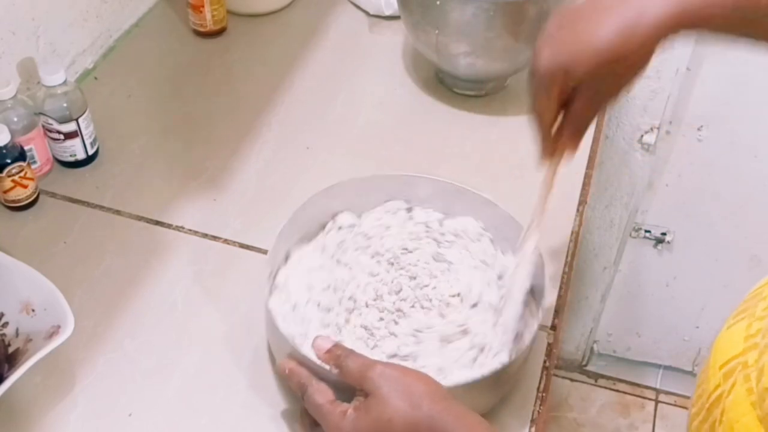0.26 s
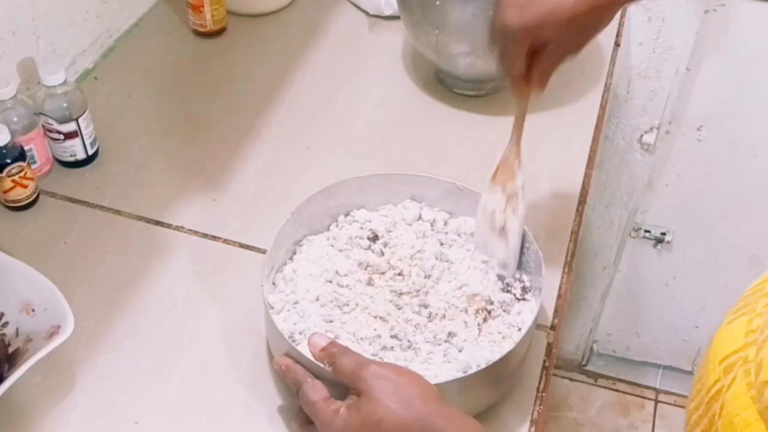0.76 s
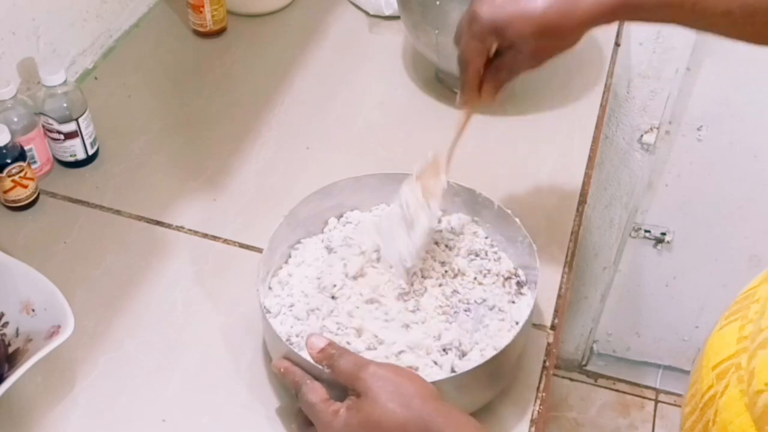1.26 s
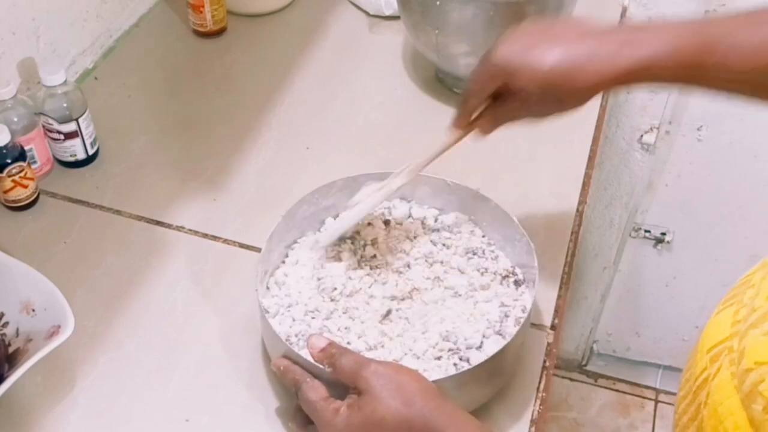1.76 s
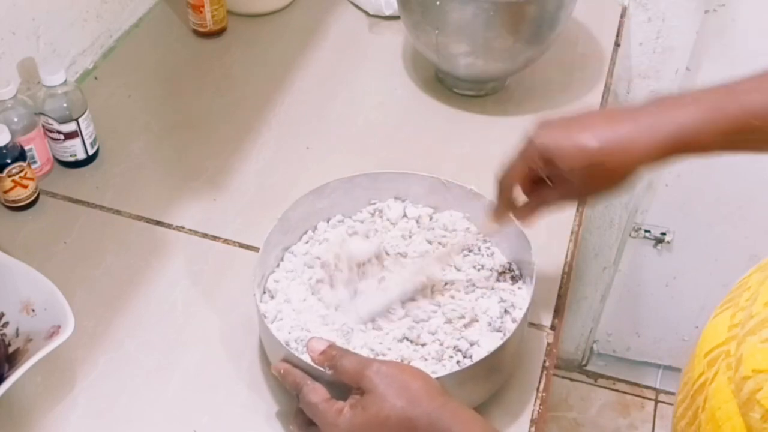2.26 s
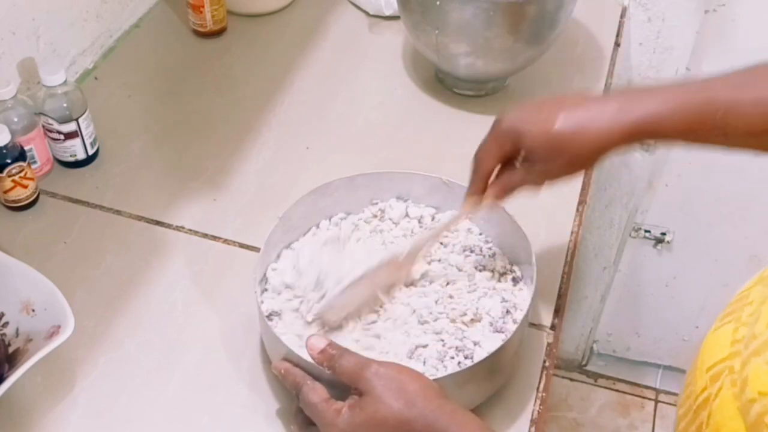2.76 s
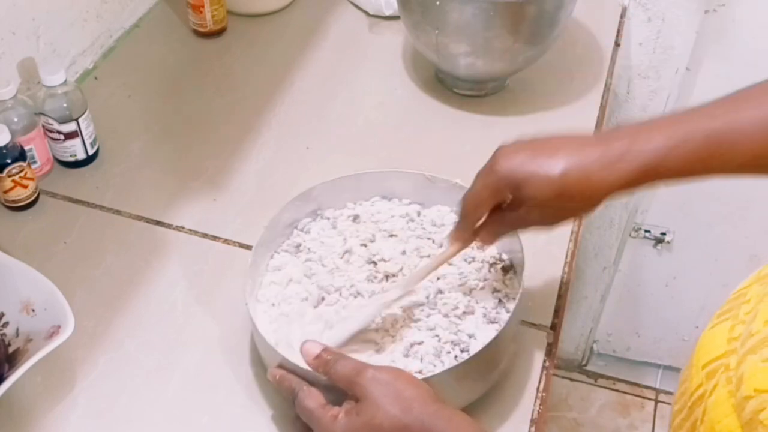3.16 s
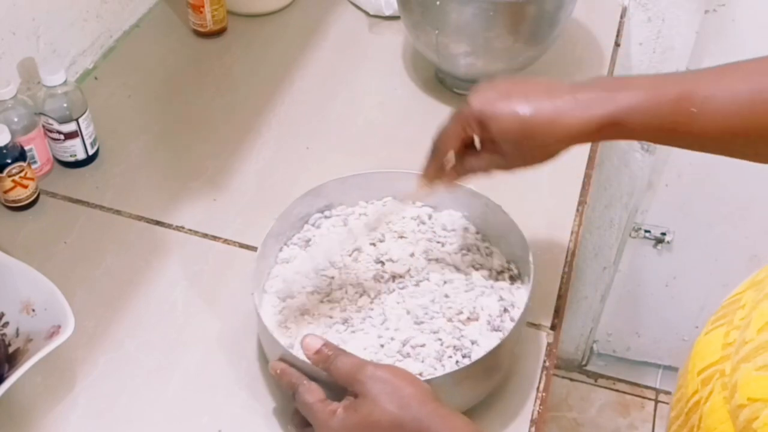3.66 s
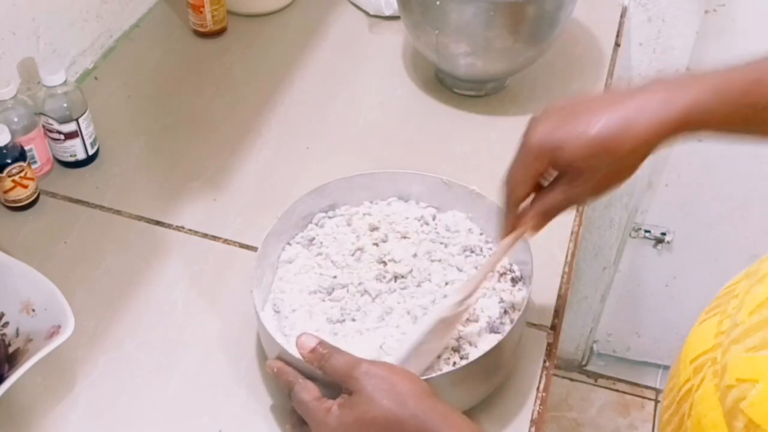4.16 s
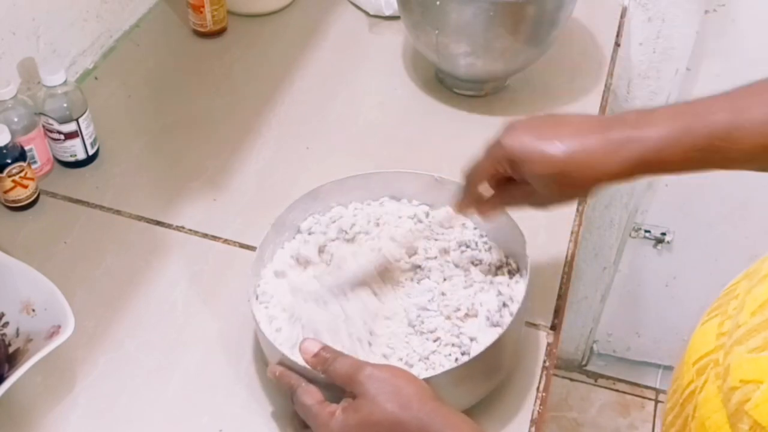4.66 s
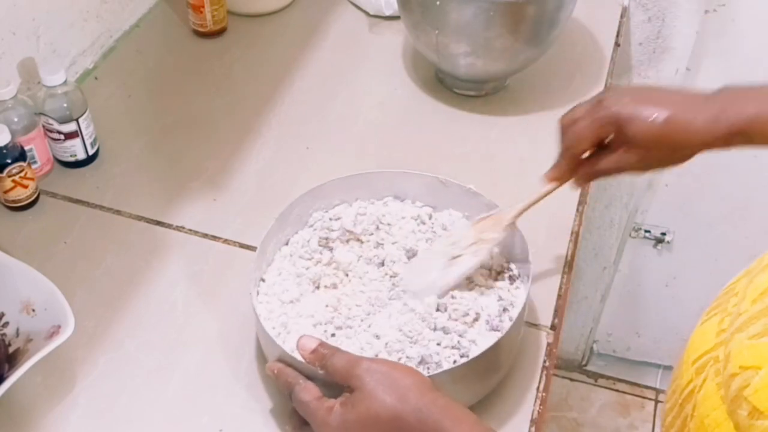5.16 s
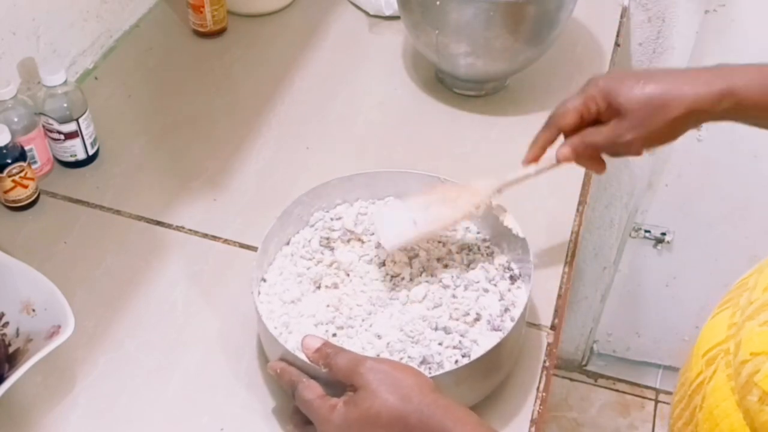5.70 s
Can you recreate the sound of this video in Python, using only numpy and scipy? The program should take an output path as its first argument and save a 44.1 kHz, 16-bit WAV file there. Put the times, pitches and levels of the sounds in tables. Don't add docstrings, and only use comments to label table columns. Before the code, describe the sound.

In a small, slightly reflective kitchen, a spoon pushes through powdery lumps with bright, sandy, fizzing strokes. Two early knocks ring the flour-damped pan briefly, a run of plain sweeps follows, then thuddier taps midway and scraping with a strong final clank. Two spaced microphones sit near the pan; mains hum, a low engine swell around two seconds, far traffic and tiny cricket chirps remain behind.

```python
import sys
import numpy as np
from scipy import signal
from scipy.fft import rfft, irfft
from scipy.io import wavfile
from scipy.ndimage import uniform_filter1d

SR = 44100
rng = np.random.default_rng(int(sys.argv[2]) if len(sys.argv) > 2 else 0)


def magnitude_from_level(level_db):
    exponent = np.asarray(level_db, float) / 20
    return 10 ** exponent


def int16_out(signal):
    q = np.round(np.clip(np.atleast_2d(signal).T, -1, 1) * 32767)
    wavfile.write(sys.argv[1], SR, q.astype(np.int16))


N = 261513
STEP = 16

# frequency in Hz, bandwidth in Hz, level in dB.
PAN_MODES = [(327, 97, 10), (506.5, 109, -6.5), (589, 68, -4), (693, 65.3, 3.5), (790, 71, -4.5),
             (844, 54.6, 0.5), (938, 64, 0.5), (980, 45, -4.5), (1008, 57, -13.5), (1193, 33, -3.5),
             (1295, 54, -20), (1408, 50, -13.5), (1416, 51, -1), (1577, 27, -5), (1700, 16, -30),
             (1902, 172, -27), (2016, 31, -18)]


def evened(x):
    return x / np.sqrt(np.mean(x ** 2) + 1e-20)


def read(points, hz):
    f, value = np.transpose(points)
    return np.interp(np.log(hz + 1), np.log(f + 1), value)


def coloured(x, points):
    gain = magnitude_from_level(read(points, np.fft.rfftfreq(N, 1 / SR)))
    return evened(irfft(rfft(x) * gain, N))


def resonate(x, hz, width):
    r = np.exp(-np.pi * width / SR)
    b = [(1 - r * r) / 2, 0, -(1 - r * r) / 2]
    return signal.lfilter(b, [1, -2 * r * np.cos(2 * np.pi * hz / SR), r * r], x)


def mode(x, hz, width):
    return resonate(resonate(x, hz, width), hz, 4 * width)


def grains(per_s, spread_db, shared):
    size = magnitude_from_level(spread_db * np.minimum(rng.exponential(1, (3, N)), 5))
    size = size * rng.choice([-1., 1.], (3, N))
    clicks = size * (rng.random((3, N)) < per_s / SR)
    return clicks[:2] + shared * clicks[2]


def patchy(x, depth_db):
    z = signal.stft(x, nperseg=512)[2]
    field = rng.standard_normal(z.shape[1:])
    field = uniform_filter1d(field, 2, axis=0)
    field = evened(uniform_filter1d(field, 10, axis=1))
    gain = magnitude_from_level(depth_db * np.clip(field, -3, 1.2))
    return evened(signal.istft(z * gain, nperseg=512)[1][:, :N])


def swell(s, rise, fall, db):
    edge_db, rise_shape, fall_shape = 33.5, 1.86, 1.55
    contact = 0.95
    t = np.arange(0, N, STEP) / SR - s
    begun = np.clip((t + contact * rise) / 0.0036, 0, 1)
    lost = np.where(t < 0, abs(t / rise) ** rise_shape, abs(t / fall) ** fall_shape)
    return begun * magnitude_from_level(db - edge_db * lost)


def joined(rows):
    power = sum(swell(*row) ** 2 for row in rows)
    return np.interp(np.arange(N), np.arange(0, N, STEP), np.sqrt(power)) + 1e-6


def background():
    # frequency in Hz, density in dB per Hz.
    air_spectrum = [(50, -32), (85, -19), (108, -14), (1100, -39), (1370, -34.5), (3000, -44.5),
                    (3730, -47.5), (4070, -43), (4960, -47), (7190, -43.5), (9560, -42), (11900, -55.5),
                    (15800, -59)]
    # peak in seconds, half length in seconds, level in dB.
    surges = [(0.297, 0.41, -44), (.93, .3, -53), (1.575, 0.31, -32.5), (1.92, 0.21, -33),
              (2.07, 0.19, -29.5), (2.249, 0.1, -28.5), (2.39, 0.2, -30), (2.61, .25, -40),
              (2.877, 0.067, -45), (3.167, 0.16, -45), (3.655, 0.14, -50), (3.94, 0.15, -39),
              (4.1, 0.19, -45), (4.27, 0.17, -41), (4.643, 0.17, -54), (5.04, 0.32, -42),
              (5.348, 0.087, -39), (5.77, 0.051, -32)]
    a, b, c = rng.standard_normal((3, N))
    air = coloured(np.array([a, 0.3 * a + 0.83 * b]), air_spectrum)
    air = magnitude_from_level(-59.0) * patchy(air, depth_db=1.5)
    subsonic = magnitude_from_level(-54.5) * evened(resonate(resonate(air, 23, 19), 23, 19))
    t = np.arange(N) / SR
    hum_hz, hum_db = 49.7, -43
    hum_gain = magnitude_from_level(hum_db + 3.05 * np.sin(2 * np.pi * 0.13 * t + 3.4)) * np.sqrt(2)
    hum = hum_gain * np.sin(2 * np.pi * hum_hz * t + 1.11 * np.sin(2 * np.pi * 0.381 * t))
    engine = evened(mode(mode(c, 58.24, 5.8), 58.6, 8.3))
    engine /= np.sqrt(uniform_filter1d(engine ** 2, 3500) + 0.018)
    engine = joined((s, half, half, db) for s, half, db in surges) * engine
    flank = magnitude_from_level(-58) * evened(mode(b, 67.7, 18.2))
    return air + subsonic + flank + hum + engine


def traffic():
    # peak in seconds, rise in seconds, fall in seconds, level in dB.
    passing = (4, 1.2, 0.8, -60.5)
    noise = rng.standard_normal((2, 3, N))
    low, high = noise[:, :2] + 0.9 * noise[:, 2:]
    low = evened(mode(low, 140, 76)) * (magnitude_from_level(-66.5) + joined([passing]))
    high = evened(mode(high, 394, 67)) * magnitude_from_level(-67)
    return patchy(low + high, depth_db=8.0) * np.std(low + high)


def insects():
    # start in seconds, length in seconds, frequency in Hz, level in dB.
    chirps = [(0.063, 0.08, 3750, -61.5), (0.058, 0.17, 3230, -88), (0.514, 0.05, 3470, -65),
              (1.272, .07, 3760, -67), (1.257, 0.1, 5940, -68), (2.05, 0.076, 5900, -72),
              (2.35, .05, 3380, -63), (2.414, 0.089, 7500, -77), (2.478, 0.073, 3740, -61),
              (2.5, 0.035, 3400, -82), (2.506, 0.046, 7720, -69), (2.902, 0.1, 7840, -69),
              (2.914, 0.04, 9600, -63), (3.28, 0.062, 5860, -73), (3.292, 0.056, 9400, -71),
              (3.922, .04, 9500, -88), (4.062, .03, 9500, -58), (4.872, 0.031, 9400, -63),
              (4.048, 0.045, 3300, -73), (4.355, 0.14, 7160, -67.5), (4.902, 0.075, 3740, -58.5),
              (4.928, 0.052, 3460, -63), (5.49, 0.098, 3790, -63), (5.523, 0.04, 3390, -63)]
    t, out = np.arange(N) / SR, np.zeros((2, N))
    for s, length, hz, db in chirps:
        at, size = round(s * SR), round(length * SR)
        drift = np.cumsum(rng.standard_normal((2, SR // 4)), axis=1)[:, :size]
        pulses = signal.windows.tukey(size, .4) * (1 + 0.31 * np.sin(2 * np.pi * 42 * t[:size]))
        tone = np.sin(2 * np.pi * hz * t[:size] + 0.062 * drift[0])
        out[:, at:at + size] += magnitude_from_level(db) * pulses * tone
    trill = evened(resonate(rng.standard_normal((2, N)), 7000, 14))
    trill = trill * (1 + 0.23 * np.sin(2 * np.pi * 55 * t))
    far = evened(resonate(rng.standard_normal((2, N)), 3430, 24.05))
    return out + magnitude_from_level(-75) * trill + magnitude_from_level(-78) * far


def strokes():
    # peak in seconds, rise in seconds, fall in seconds,
    # crumb hiss in dB, grit relative to the hiss in dB.
    sweeps = [(0.0, 0.035, 0.047, -49.5, -9), (0.272, 0.056, .07, -35, -1.5),
              (.363, 0.23, 0.13, -35.5, -8.5), (.65, .016, 0.19, -34, -1.5),
              (0.829, 0.098, 0.22, -34.5, -11), (0.989, 0.2, 0.17, -40.5, -9.5),
              (1.462, 0.15, 0.16, -33, -9), (1.869, 0.12, 0.16, -32.5, -9.5),
              (2.202, 0.048, 0.18, -33.5, -9.5), (2.699, 0.15, 0.14, -33.5, -7),
              (3.097, 0.096, 0.14, -36, -11), (3.443, 0.093, 0.14, -34.5, -26),
              (3.67, 0.053, .13, -37, -13), (3.775, 0.1, 0.13, -39, -13), (4.17, 0.086, 0.098, -42.5, -18),
              (4.238, 0.13, 0.14, -35.5, -7.5), (4.629, 0.12, 0.15, -31, -9.5),
              (5.05, 0.042, 0.3, -38.5, -18.5), (5.11, 0.095, 0.29, -31.5, -19),
              (5.2, .13, 0.21, -32, -13.5), (5.31, 0.14, 0.11, -36, -18.5), (5.74, 0.022, .15, -37.5, -4),
              (5.81, 0.1, 0.236, -32, -16.5), (5.9, 0.089, 0.27, -34.5, -9.5)]
    # peak in seconds, rise in seconds, fall in seconds,
    # pressure on the pan in dB, crushed lumps in dB.
    rubs = [(.285, 0.061, 0.16, -36, -37.5), (0.418, 0.14, 0.066, -49, -77),
            (.655, 0.036, 0.23, -38.5, -37), (.91, 0.14, 0.059, -69, -45), (1.045, 0.11, .02, -60, -50),
            (1.065, 0.0074, .15, -48, -49), (1.5, 0.071, .15, -55.5, -50.5),
            (2.25, 0.085, 0.029, -57, -100), (2.724, 0.13, 0.073, -52.5, -44.5),
            (3.099, 0.078, 0.051, -55.5, -52.5), (4.66, 0.16, 0.19, -55.5, -50.5),
            (3.384, 0.022, 0.15, -49, -53), (3.49, 0.059, 0.042, -58, -69),
            (3.651, 0.035, 0.12, -40.5, -62), (3.76, 0.073, 0.11, -48.5, -75),
            (5.038, 0.026, 0.29, -40, -46.5), (5.2, 0.18, 0.2, -49, -36.5), (5.283, 0.2, 0.15, -40.5, -46),
            (5.74, 0.024, 0.24, -35, -37.5), (5.85, 0.13, 0.286, -45, -41.5)]
    lumps_db, lumps_with_grit = -5.5, 0.88
    brush_db, brush_width, brush_late_s = -25.5, 0.27, 0.011
    hiss_rows, grit_rows, lump_rows, press_rows = [], [], [], []
    for s, rise, fall, db, grit_db in sweeps:
        late = s + brush_late_s
        hiss_rows.append((s, rise, fall, db))
        grit_rows.append((s, rise, fall, db + grit_db))
        lump_rows.append((late, rise, fall, db + lumps_db + lumps_with_grit * grit_db))
        press_rows.append((late, brush_width * rise, brush_width * fall, db + brush_db + grit_db))
    for s, rise, fall, press_db, crushed_db in rubs:
        lump_rows.append((s, rise, fall, crushed_db))
        press_rows.append((s, rise, fall, press_db))
    hiss = joined(hiss_rows)
    return hiss, joined(grit_rows) / hiss, joined(lump_rows) / hiss, joined(press_rows)


def crumbs(hiss, grit_share, lumps_share):
    # frequency in Hz, density in dB per Hz.
    fine_spectrum = [(2120, -56), (3600, -12.5), (4550, -6), (5910, -7), (7850, -3.5), (8510, -3),
                     (9810, -0.5), (11800, -8.5), (15100, -11), (15800, -12)]
    grit_spectrum = [(1500, -36.5), (2200, -2.5), (2700, -2.5), (3300, -3), (3900, -7.5), (5500, -36)]
    lump_spectrum = [(450, -42), (750, -18.5), (1150, 1.5), (1500, 0.5), (1800, 5.5), (2150, -1),
                     (2800, -25)]
    fine = coloured(grains(per_s=12000, spread_db=2.0, shared=0.11), fine_spectrum)
    grit = coloured(grains(per_s=3300, spread_db=3.0, shared=0.72), grit_spectrum) * grit_share
    lumps = coloured(grains(per_s=1600, spread_db=1.0, shared=0.36), lump_spectrum)
    rough = grit + lumps * np.minimum(lumps_share, 1)
    return hiss * (patchy(fine, depth_db=2.5) + patchy(rough, depth_db=5.0) * np.std(rough))


def scrape(press):
    slips = grains(per_s=1700, spread_db=3.0, shared=3.6)
    ring = 0
    for k, (hz, width, db) in enumerate(PAN_MODES[1:]):
        ring = ring + (-1) ** k * magnitude_from_level(db - 2.0 * hz / 1000) * mode(slips, hz, 1.04 * width)
    limit_db = -39
    return np.minimum(press, magnitude_from_level(limit_db)) * evened(ring)


def knocks():
    # start in seconds, level in dB, lowest and highest part of the pan reached in Hz,
    # crack relative to the ring in dB.
    blows = [(.274, -13.5, 540, 885, -9), (0.3, -29, 566, 950, -10), (.324, -28, 570, 950, -7),
             (0.632, -37, 684, 1980, 8), (.637, -12.5, 620, 1900, 0), (.658, -21, 480, 1310, -12),
             (0.665, -21.5, 480, 920, 2), (1.06, -28, 735, 1260, -20), (1.07, -38, 670, 1190, -28),
             (1.112, -39, 650, 1200, -34), (2.194, -39, 1500, 1970, -1), (3.364, -53, 604, 1590, -25),
             (3.38, -25, 490, 1500, -30), (3.646, -20, 670, 1040, -11.5), (3.699, -54, 600, 1100, -15),
             (5.034, -21, 762, 1700, -9), (5.059, -36, 500, 1300, 11), (5.276, -24.5, 860, 980, -4),
             (5.728, -9.5, 600, 1800, -10), (5.744, -20.5, 520, 1500, -4), (.256, -30, 1500, 2300, 1)]
    out, t = np.zeros((2, N + SR)), np.arange(SR // 6) / SR
    hz, width, pan_db = np.transpose(PAN_MODES)
    for s, db, low_hz, high_hz, crack_db in blows:
        noise, luck = rng.standard_normal((3, 2, len(t))), rng.standard_normal(len(PAN_MODES))
        push = (noise[0] + 2.3 * noise[2, 0]) * np.minimum(t / 0.00096, 1) * np.exp(-t / 0.002)
        below, above = np.log2(low_hz / hz), np.log2(hz / high_hz)
        outside = 0.52 * np.maximum(below, 0) + np.maximum(above, 0)
        near = magnitude_from_level(0.21 * pan_db + 2.2 * luck - 42.0 * outside)
        choked, free = 0, 0
        for k in range(len(PAN_MODES)):
            gain = (-1) ** k * near[k]
            choked = choked + gain * mode(push, hz[k], 3.97 * width[k])
            free = free + gain * mode(push, hz[k], 1.03 * width[k])
        ring = signal.lfilter(*signal.butter(4, 1.26 * high_hz, fs=SR), choked + magnitude_from_level(-4.0) * free)
        crack = mode(noise[1], 4900, 3020) * np.exp(-t / 0.01) * np.minimum(t / 0.00031, 1)
        at = round(s * SR)
        out[:, at:at + len(t)] += magnitude_from_level(db) * (ring / abs(ring).max() + magnitude_from_level(crack_db) * crack)
    return out[:, :N]


def thuds():
    # start in seconds, level in dB.
    jolt_rows = [(.274, -55), (0.3, -52), (0.635, -49), (.665, -48), (3.38, -41.5), (3.645, -37.5),
                 (3.698, -50), (5.032, -50.5), (5.059, -61), (5.727, -34), (5.744, -44)]
    jolts, t = np.zeros(N), np.arange(SR // 6) / SR
    for s, db in jolt_rows:
        jolts[round(s * SR)] = magnitude_from_level(db)
    push = np.sin(2 * np.pi * 135 * t) * np.exp(-t / 0.005)
    knock = 2.4 * np.sin(2 * np.pi * 255 * t) * np.exp(-t / 0.0025)
    return signal.oaconvolve(jolts, push + knock)[:N]


def kitchen(x):
    # frequency in Hz, time to fall by 60 dB in seconds.
    decay = [(150, 0.29), (700, 0.26), (2000, 0.13), (6000, 0.23), (15000, 0.033)]
    taps = np.zeros((2, SR // 2))
    at = np.arange(120, SR // 2 - 20, 20) + rng.integers(0, 20, (2, (SR // 2 - 121) // 20))
    np.put_along_axis(taps, at, rng.choice([-1., 1.], at.shape), 1)
    hz, t, z = signal.stft(taps, SR, nperseg=256)
    fading = magnitude_from_level(-60 * t / read(decay, hz)[:, None])
    tail = signal.istft(z * fading, SR, nperseg=256)[1]
    return signal.fftconvolve(x, tail / np.linalg.norm(tail[0]), axes=1)[:, :N]


def scene():
    under = background() + traffic() + insects()
    hiss, grit, lumps, press = strokes()
    rubbing = crumbs(hiss, grit, lumps) + scrape(press)
    blows = knocks() + thuds()
    direct = magnitude_from_level(-0.5) * rubbing + magnitude_from_level(2.0) * blows
    reflected = kitchen(magnitude_from_level(-7.5) * rubbing + magnitude_from_level(-3.0) * blows)
    return direct + reflected + under


def roll_off(x):
    return signal.sosfilt(signal.butter(12, 16970, fs=SR, output="sos"), x)


def record(dry):
    # frequency in Hz, left minus right in dB.
    left_over_right = [(60, -1.5), (180, -2), (550, -2.5), (1650, -1.5), (4970, 1.5), (15000, -7.5)]
    lag, margin = 44, 2048
    edge_hz = 15820
    dry = np.pad(dry, ((0, 0), (margin, margin)), "reflect")
    hz = np.fft.rfftfreq(dry.shape[1], 1 / SR)
    balance = magnitude_from_level(np.outer([.5, -.5], read(left_over_right, hz)))
    x = irfft(rfft(dry) * balance * (hz < edge_hz), dry.shape[1])
    mix = np.array([x[0, margin - lag:][:N], x[1, margin:][:N]])
    return roll_off(mix)


dry = scene()
out = record(dry)
int16_out(out)
```